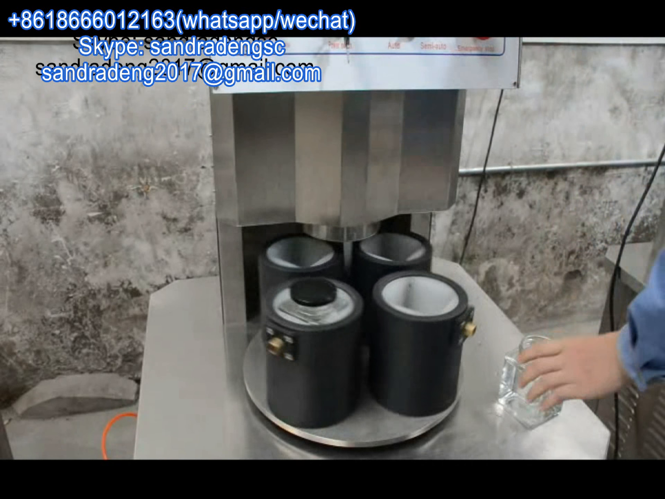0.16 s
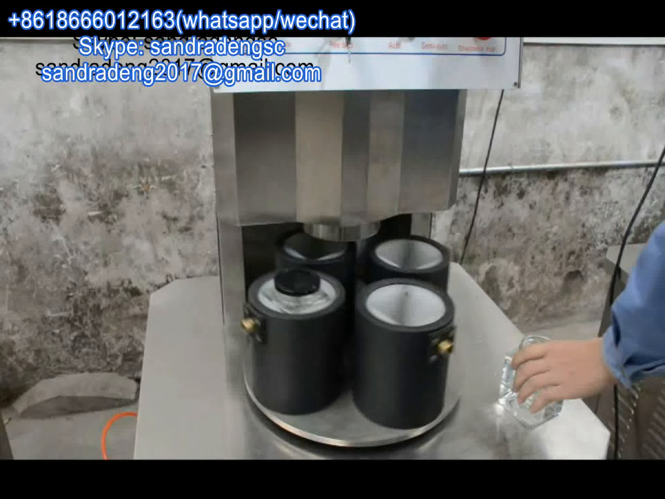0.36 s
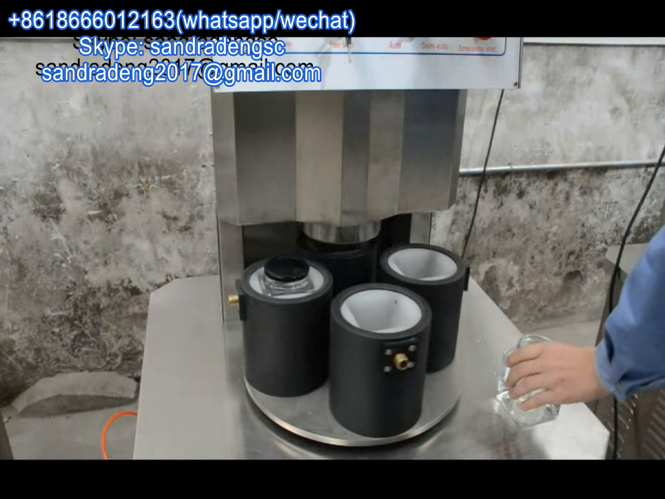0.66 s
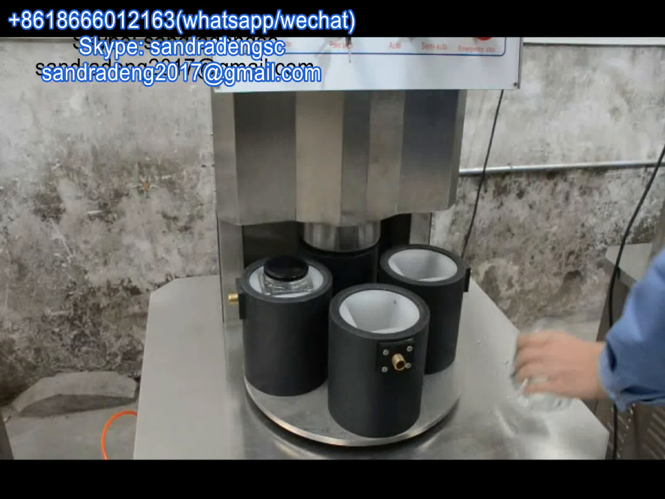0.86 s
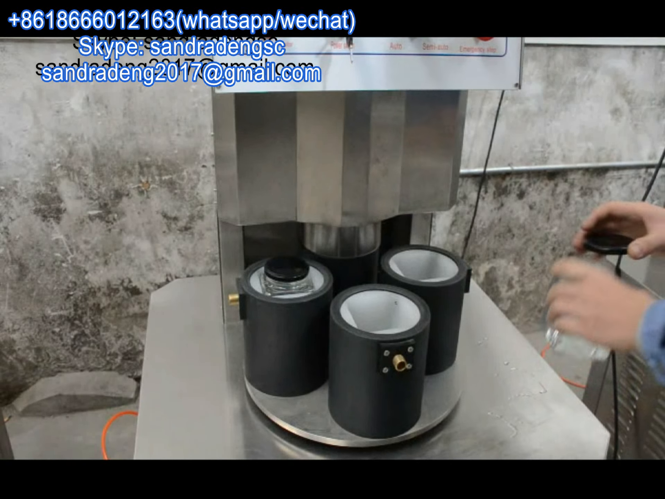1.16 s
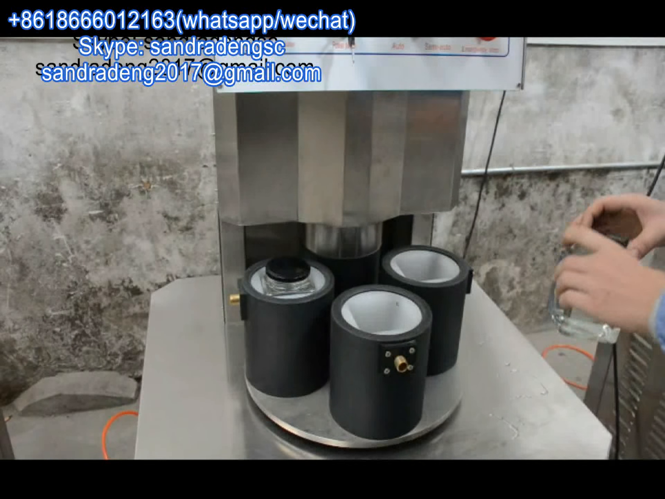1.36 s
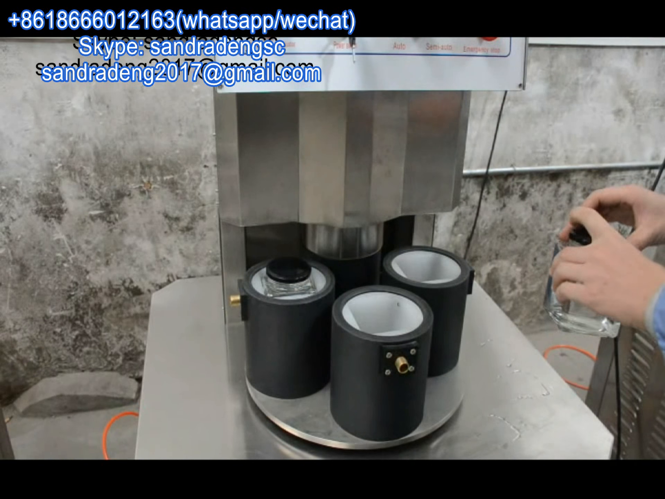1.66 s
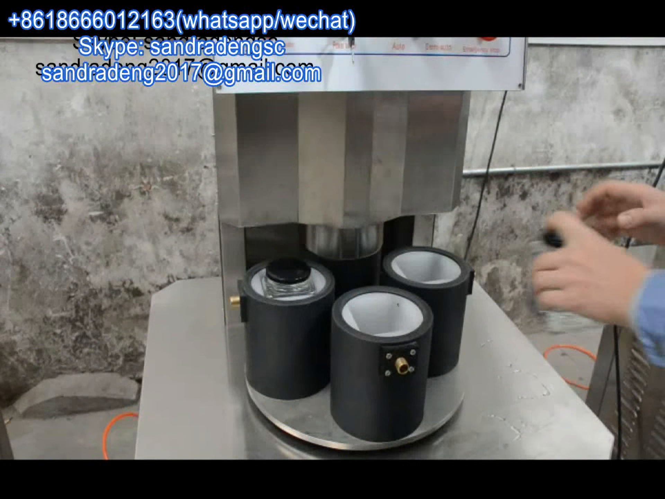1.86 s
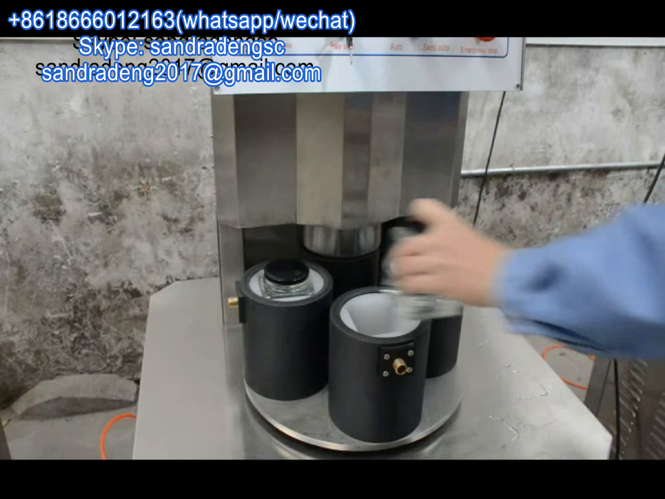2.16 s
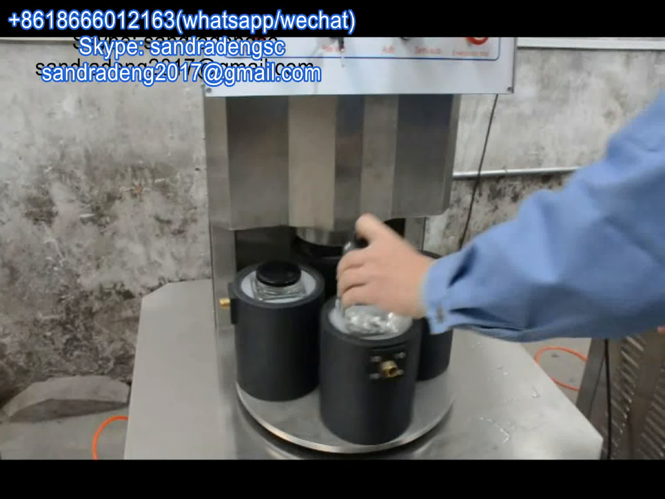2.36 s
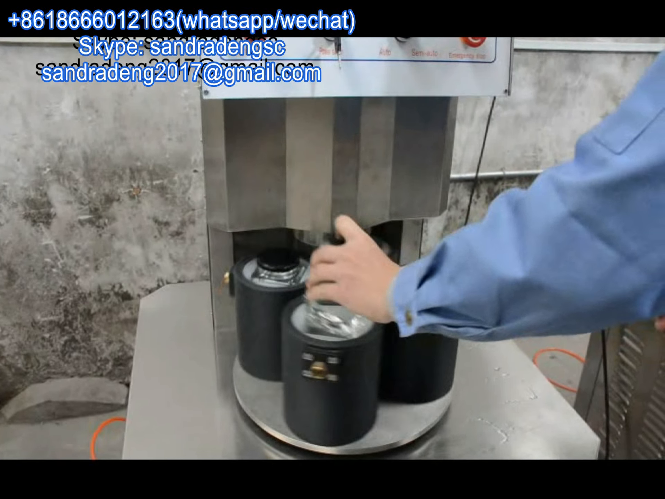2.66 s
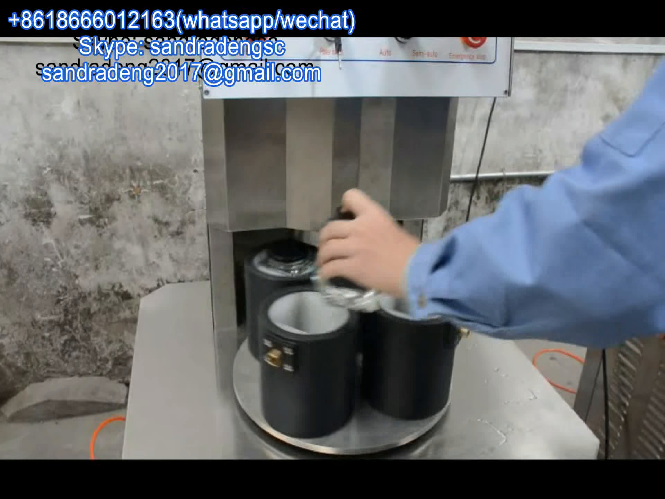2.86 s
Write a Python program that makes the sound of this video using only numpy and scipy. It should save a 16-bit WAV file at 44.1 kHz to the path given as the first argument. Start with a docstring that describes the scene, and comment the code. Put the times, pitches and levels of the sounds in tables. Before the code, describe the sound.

Pneumatic capping machine with sharp hisses, metal clunks, ratchet chatter and glass rattle over distant machine drone

```python
"""Pneumatic capping machine in a workshop

Valves spit, exhausts sigh and snap: shaped bursts of coloured noise, plus short dying tones. Cylinders clunk on
a steel frame, the capping head chatters tooth by tooth, a lid meets a jar, and the jar rattles: short noisy
contacts with dying tones. Thumps are dull noise, holder knocks tones. A long hall tail follows them over a
drone of distant machines. Both channels are the same."""
import sys
import numpy as np
from scipy import signal
from scipy.fft import rfft, irfft
from scipy.io import wavfile

SR = 44100
rng = np.random.default_rng(int(sys.argv[2]) if len(sys.argv) > 2 else 0)


def nominal_scale(level):
    """Amplitude ratio for a level in decibels (scalar or array-like)."""
    x = np.asarray(level, float) / 20
    return 10 ** x


def bounce(signal):
    """Save signal as a 16-bit WAV file at the path given by the first command-line argument."""
    frames = np.transpose(np.atleast_2d(signal))
    limited = np.clip(frames, -1, 1)
    pcm = np.round(limited * 32767).astype(np.int16)
    wavfile.write(sys.argv[1], SR, pcm)


N = 132300  # three seconds


def rms_one(x):
    """Scale a sound to an average strength (rms) of 1."""
    return x / np.sqrt(np.mean(x ** 2) + 1e-20)


def at_hz(points, hz):
    """Read a table of (Hz, value) between its points, on a log-frequency axis."""
    table = np.array(points)
    return np.interp(np.log(hz), np.log(table[:, 0]), table[:, 1])


def coloured(size, colour_db):
    """Noise of rms 1 whose spectrum in dB is a function of Hz."""
    hz = np.maximum(np.fft.rfftfreq(size, 1 / SR), 1)
    white = rfft(rng.standard_normal(size))
    return rms_one(irfft(white * nominal_scale(colour_db(hz)), size))


def drift(rate_hz):
    """A slow random wander of rms about 1: noise smoothed twice; a higher rate wanders faster."""
    r = np.exp(-2 * np.pi * rate_hz / SR)
    wander = signal.lfilter([1], [1, -2 * r, r * r], rng.standard_normal(N + SR))
    return rms_one(wander[SR:])  # the first second lets the filter settle


def add(out, start, rise, hold, fall, db, colour_db):
    """Add a burst of coloured noise that rises, holds and dies away; times in seconds."""
    sound = coloured(32768, colour_db)
    t = np.arange(len(sound)) / SR
    shape = np.minimum(t / rise, 1) * np.exp(-np.maximum(t - rise - hold, 0) / fall)
    # even out the luck of the noise, so that the shape alone sets the energy
    sound = sound * np.sqrt(np.sum(shape ** 2) / np.sum((shape * sound) ** 2))
    i = int(start * SR)
    out[i:i + len(t)] += (nominal_scale(db) * shape * sound)[:len(out) - i]


def strike(start, db, ring_hz, fall):
    """One mode struck once: a quick rise, then a sine that dies away over the fall in seconds."""
    t = np.maximum(np.arange(N) / SR - start, 0)
    envelope = np.minimum(t / 0.0015, 1) * np.exp(-t / fall)
    return nominal_scale(db) * envelope * np.sin(2 * np.pi * ring_hz * t)


def tilt(hz, bass_db, treble_db):
    """Raise or lower the bass below one corner and the treble above another."""
    bass_hz, treble_hz = 412, 1880
    return bass_db / (1 + (hz / bass_hz) ** 4) + treble_db / (1 + (treble_hz / hz) ** 4)


def drone():
    """Distant machines as noise: a steady roar, a wavering hum, rumble and a fading earlier cycle."""
    # Colour of the roar. Each row: frequency in Hz, relative level in dB per Hz.
    roar_colour = [(18, -65), (30, -75), (100, -57), (133, -12), (196, -13.5), (241, -8), (470, -11),
                   (548, -6), (849, -3), (1040, -3.5), (1660, -8), (2630, -14.5), (2840, -8.5), (9520, -37),
                   (14000, -99)]
    # The hum swells under load. Each row: time in seconds, level in dB.
    hum_level = [(0, -55.5), (1.2, -53.5), (1.6, -36.5), (2.0, -42), (2.499, -37), (3, -49.5)]
    roar_db, flicker_db, flicker_hz = -31, 1.5, 4.8
    hum_hz, hum_width_hz = 131, 12
    rumble_db, rumble_top_hz = -57.5, 88
    earlier_db, earlier_fade_db_per_s = -27.5, 21.5
    t = np.arange(N) / SR

    roar = coloured(N, lambda hz: at_hz(roar_colour, hz))
    roar = roar * nominal_scale(roar_db + flicker_db * drift(flicker_hz))
    # noise this narrow sounds like a wavering tone
    hum = coloured(N, lambda hz: -20 * np.log10(1 + ((hz - hum_hz) / hum_width_hz) ** 2))
    hum = hum * nominal_scale(np.interp(t, *np.transpose(hum_level)))
    rumble = nominal_scale(rumble_db) * coloured(N, lambda hz: -10 * np.log10(1 + (hz / rumble_top_hz) ** 8))
    # an earlier cycle still rings at the start
    earlier = coloured(N, lambda hz: at_hz(roar_colour, hz) + tilt(hz, 0.89, 8.2))
    earlier = earlier * nominal_scale(earlier_db - earlier_fade_db_per_s * t)
    return roar + hum + rumble + earlier


def hall(x):
    """The echo of the hall: a diffuse tail of noise bands that each die at their own rate."""
    # How long the hall rings. Each row: frequency in Hz, time to fall by 60 dB in seconds.
    ring_time = [(100, 1.3), (500, 1.6), (1500, 1.35), (4000, 1.13), (8000, 0.56), (13000, 0.37)]
    level_db, gap_s, build_s = -3.5, 0.0014, 0.026
    size = 2 * SR
    t = np.arange(size) / SR
    hz = np.maximum(np.fft.rfftfreq(size, 1 / SR), 1)
    white = rfft(rng.standard_normal(size))
    tail = np.zeros(size)
    for centre in 60 * 2.0 ** np.arange(9):  # one band per octave, overlapping its neighbours
        octaves = np.clip(np.log2(hz / centre), -1, 1)
        share = np.cos(np.pi / 2 * octaves) ** 2
        tail += irfft(white * share, size) * nominal_scale(-60 * t / at_hz(ring_time, centre))
    tail *= np.clip((t - gap_s) / build_s, 0, 1)
    tail = tail / np.sqrt(np.sum(tail ** 2))
    return nominal_scale(level_db) * signal.fftconvolve(x, tail)[:N]


def ticks():
    """Faint high ticks: tiny bursts of noise around one high frequency."""
    # Each row: start in seconds, level in dB.
    tick_rows = [(.912, -58), (2.735, -62)]
    tick_hz, fall = 9900, 0.0026
    out = np.zeros(N)
    for start, db in tick_rows:
        add(out, start, 0.001, 0.002, fall, db, lambda hz: -500 * np.log(hz / tick_hz) ** 2)
    return out


def thumps():
    """Close dull thumps of valves and pistons: short pushes of noise with little above a corner."""
    # Each row: start in seconds, level in dB, upper corner in Hz, length in seconds.
    thump_rows = [(0.517, -21, 800, 0.011), (1.057, -27.5, 231, 0.027), (1.363, -18, 892, 0.004),
                  (1.432, -23.5, 394, 0.029), (1.471, -35, 90, .02), (1.964, -20, 1120, 0.0067),
                  (2.316, -17, 428, 0.012)]
    out = np.zeros(N)
    for start, db, corner_hz, length in thump_rows:
        low_hz = min(190, corner_hz / 2)

        def colour(hz):
            low_cut = -10 * np.log10(1 + (low_hz / hz) ** 6)
            high_cut = -10 * np.log10(1 + (hz / corner_hz) ** 6)
            return low_cut + high_cut

        add(out, start, 0.002, length, 0.66 * length, db, colour)
    return out


def holder_knocks():
    """Solid knocks on the holder or frame ring two of its modes."""
    # Each row: start in seconds, low ring in dB, high ring in dB.
    knock_rows = [(1.571, -15, -8), (2.316, -12, -30), (2.417, -30, -11)]
    low_hz, low_fall, high_hz, high_fall = 318, 0.011, 1231, 0.0081
    out = np.zeros(N)
    for start, low_db, high_db in knock_rows:
        out += strike(start, low_db, low_hz, low_fall)
        out += strike(start, high_db, high_hz, high_fall)
    return out


def lid_on_jar():
    """The lid meets the glass: each touch rings the modes of the jar and rubs noise through them."""
    # The lid scraped on glass. Each row: start in seconds, level in dB.
    touches = [(1.396, -19.5), (1.418, -18)]
    # Modes of the jar. Each row: frequency in Hz, level in dB, width in Hz (for the rub).
    glass_modes = [(1514, -5.5, 48), (1880, -2, 64), (2190, -1, 53)]
    contact, ring_db = 0.0072, 9  # seconds; clear ring against the rub
    out = np.zeros(N)

    def colour(hz):
        power = sum(nominal_scale(2 * lift_db) / (1 + ((hz - mode_hz) / width) ** 4)
                    for mode_hz, lift_db, width in glass_modes)
        return 10 * np.log10(power)

    for start, db in touches:
        for mode_hz, lift_db, _ in glass_modes:
            out += strike(start, db + lift_db + ring_db, mode_hz, contact)
        add(out, start, 0.002, contact, 0.006, db, colour)
    return out


def jar_rattle():
    """The jar rattles into its holder: each hit is a short ring with grit around its pitch."""
    # Each row: start in seconds, level of the ring in dB, ring in Hz.
    hits = [(2.283, -10, 3660), (2.306, -15, 3050), (2.33, -8, 3120), (2.345, -5, 2820), (2.371, -9, 3690),
            (2.38, -7, 2710), (2.375, -8, 4680), (2.421, -5.5, 3880), (2.534, -13, 3840)]
    fall, grit_db, relative_width = 0.0035, -11, 0.077  # seconds; grit against the ring
    out = np.zeros(N)
    for start, db, ring_hz in hits:

        def colour(hz):
            peak = -15 * np.log10(1 + (np.log(hz / ring_hz) / relative_width) ** 2)
            high_cut = -10 * np.log10(1 + (hz / 6000) ** 8)
            return peak + high_cut

        out += strike(start, db, ring_hz, fall)
        add(out, start, 0.001, 0.003, fall, db + grit_db, colour)
    return out


def chatter():
    """Ratchet teeth knock the head and ring the pawl, every other one the housing: knocks, rings."""
    # Colour of the head. Each row: frequency in Hz, relative level in dB per Hz.
    head_colour = [(50, -41), (110, -34), (185, 5), (350, -9), (750, -3), (1150, -2.5), (1600, -2.5),
                   (1950, -4), (2130, -3), (2400, -6.5), (3600, -11), (6000, -21), (13000, -60)]
    # Strength along the way, before the differences from tooth to tooth.
    # Each row: time in seconds, body knock in dB, pawl ring in dB, housing ring in dB.
    strength = [(.68, -21, -16, -20), (.74, -21, -14, -19), (.83, -24, -10, -25), (.9, -26, -16, -40),
                (.955, -22, -13, -40), (.985, -28, -20, -40)]
    first_s, gap_s, slowing_s, jitter_s, teeth = 0.6833, 0.0183, 0.000032, 0.0006, 17
    weak_tooth_db, spread_db = -6, 1.2
    contact, knock_bass_db = 0.0077, -10
    pawl_hz, pawl_fall = 2140, 0.0071
    housing_hz, housing_fall, housing_lag_s = 184, 0.013, 0.008

    def knock_colour(hz):
        return at_hz(head_colour, hz) + tilt(hz, knock_bass_db, 0)

    knocks, rings = np.zeros((2, N))
    times, *columns = np.transpose(strength)
    chance = rng.standard_normal((teeth, 3))
    for k, (late, loud, sharp) in enumerate(chance):
        start = first_s + (gap_s + slowing_s * k) * k + jitter_s * late
        body_db, pawl_db, housing_db = (np.interp(start, times, column) for column in columns)
        weak = k % 2  # every second tooth is weak
        tooth_db = weak_tooth_db * weak + spread_db * loud
        add(knocks, start, 0.001, 0.002, contact, body_db + tooth_db, knock_colour)
        rings += strike(start, pawl_db + tooth_db, pawl_hz * (1 + 0.038 * sharp), pawl_fall)
        if not weak:
            rings += strike(start + housing_lag_s, housing_db, housing_hz * (1 + 0.05 * sharp), housing_fall)
    # the head stops with a knock
    add(knocks, 0.9965, 0.001, 0.003, contact, -13, knock_colour)
    # the head grinds, bass-heavy, as it starts
    add(knocks, 0.61, 0.01, 0.13, 0.2, -27, lambda hz: at_hz(head_colour, hz) + tilt(hz, 2.5, 0))
    return knocks, rings


def clunks():
    """Each blow is a short grinding contact that shakes the frame and its modes, with a clear ring."""
    # Each row: start in seconds, level in dB, bass in dB, treble in dB, contact length in seconds
    # (it scales hold and fall), frequency in Hz that the place struck favours.
    blows = [(0.655, -8.5, -25, 11, 0.0074, 868), (1.08, -16, -3.5, 4, 0.018, 1225),
             (1.427, -17, 3, -8, 0.019, 755), (1.47, -13, 0.5, 14, 0.01, 953),
             (1.569, -11, -4, 4.5, 0.018, 1145), (1.609, -22.5, 0.5, -8, 0.042, 984),
             (1.657, -31, -14, -1, 0.014, 1030), (2.039, -6, -1.5, 2.5, 0.01, 826),
             (2.093, -16.5, -28, -14, 0.021, 790), (2.333, -16, -0.5, -8, 0.021, 990),
             (2.354, -18.5, -8, -8, 0.0085, 1250), (2.376, -15, 3.5, 1, 0.011, 1626),
             (2.412, -16.5, -14, 0, 0.017, 1250), (2.45, -16.5, -2, -2, 0.015, 1250)]
    # Colour of the frame. Each row: frequency in Hz, relative level in dB per Hz.
    frame_colour = [(35, -56), (60, -43), (250, -12), (1200, -2), (1680, -7), (2840, -11.5), (5330, -22),
                    (5790, -21.5), (7610, -21.5), (9000, -34.5), (11700, -59), (19800, -120)]
    # Ringing of the frame. Each row: frequency in Hz, dB above the body, width in Hz.
    frame_modes = [(186, 10.5, 77), (342, 4.5, 41), (790, 1.5, 150), (1010, 0.5, 18), (1250, -0.5, 20),
                   (2100, -5.5, 130), (3030, 4, 400)]
    ring_db = -4  # clear ring against the grinding part
    favour_db, favour_width = 2, 0.15
    out = np.zeros(N)
    for start, db, bass_db, treble_db, contact, favoured_hz in blows:

        def colour(hz):
            body = at_hz(frame_colour, hz) + tilt(hz, bass_db, treble_db)
            place = favour_db / (1 + (np.log(hz / favoured_hz) / favour_width) ** 2)
            modes = sum(lift_db / (1 + ((hz - mode_hz) / width) ** 2)
                        for mode_hz, lift_db, width in frame_modes)
            return body + place + modes

        out += strike(start, db + ring_db, favoured_hz, contact)
        add(out, start, 0.001, 0.51 * contact, 1.17 * contact, db, colour)
    return out


def snaps():
    """Sharp snaps inside an exhaust: very short dying tones."""
    # Each row: start in seconds, level in dB, ring in Hz.
    snap_rows = [(1.247, -7, 3000), (1.266, -3, 3030), (1.285, -10, 3050), (1.299, -9, 3280),
                 (1.319, -14, 3150)]
    return sum(strike(start, db, ring_hz, 0.002) for start, db, ring_hz in snap_rows)


def sighs():
    """Long exhaust sighs: air noise that swells, holds and dies while its level flutters."""
    # Each row: start in seconds, rise in seconds, hold in seconds, level in dB, fall in seconds.
    sigh_rows = [(0.219, 0.027, 0.039, -18.5, 0.068), (1.104, 0.011, 0.13, -25, 0.044),
                 (1.235, 0.01, 0.045, -16.5, 0.067), (1.59, 0.016, 0.029, -25, 0.1),
                 (2.067, 0.12, 0.18, -21.5, .05), (2.26, 0.02, 0.08, -20.5, 0.18),
                 (2.497, 0.0074, 0.046, -41, 0.038)]
    # Colour of the air. Each row: frequency in Hz, relative level in dB per Hz.
    air_colour = [(880, -33), (1660, -13.5), (2050, -6), (2430, -4.5), (3410, 0.5), (4390, -13.5),
                  (4740, -10), (5460, -12), (5780, -14), (9340, -23.5), (11100, -51), (13600, -59),
                  (14300, -81)]
    flutter_db, flutter_hz = 1.5, 37
    out = np.zeros(N)
    for start, rise, hold, db, fall in sigh_rows:
        add(out, start, rise, hold, fall, db, lambda hz: at_hz(air_colour, hz))
    return out * nominal_scale(flutter_db * drift(flutter_hz))


def spits():
    """Sharp valve spits: abrupt hiss with a peak where the air whistles in the nozzle."""
    # Each row: start in seconds, hold in seconds, level in dB, nozzle whistle in Hz,
    # whistle above the hiss in dB, relative width of the whistle.
    spit_rows = [(0.509, 0.025, -27, 9400, 22.5, 0.16), (0.5215, 0.013, -10, 5530, 7, 0.072),
                 (0.577, 0.032, -23.5, 5260, 22, 0.053), (1.047, 0.02, -28.5, 9150, 16, 0.11),
                 (1.064, 0.032, -12, 4180, 2, 0.088), (1.3662, 0.0099, -9, 7580, 14, 0.16),
                 (1.384, 0.036, -19, 7430, 15, 0.026), (1.464, 0.015, -13, 5030, 5, 0.031),
                 (1.488, .008, -14, 3330, 11, .12), (1.57, 0.0046, -10, 3580, 18, 0.48),
                 (1.601, 0.0074, -11.5, 2940, 36, 0.26), (1.96, 0.0077, -21.5, 6860, 2, .1),
                 (1.971, 0.012, -8.5, 7630, 22, 0.2), (1.986, 0.023, -22, 5900, -8, 0.064),
                 (1.999, 0.039, -16.5, 3520, 4, 0.25), (2.048, 0.19, -25, 7570, 9, 0.029),
                 (2.328, 0.03, -17.5, 7350, 4, 0.038)]
    # Colour of the hiss. Each row: frequency in Hz, relative level in dB per Hz.
    hiss_colour = [(710, -26), (1200, -24), (2010, -14), (2350, -10.5), (2810, -10), (3640, 0), (4660, -7),
                   (5170, -2), (6050, -11), (7360, -8), (8250, -19.5), (9340, -21), (14300, -57.5)]
    rise, fall = 0.0008, 0.012  # seconds
    out = np.zeros(N)
    for start, hold, db, nozzle_hz, whistle_db, width in spit_rows:

        def colour(hz):
            whistle = whistle_db / (1 + (np.log(hz / nozzle_hz) / width) ** 2)
            return at_hz(hiss_colour, hz) + whistle

        add(out, start, rise, hold, fall, db, colour)
    return out


def scene():
    """All sources, their hall and the drone, the same in both channels."""
    head, rings = chatter()
    air_and_frame = spits() + sighs() + clunks()
    dull = thumps() + rings
    small = lid_on_jar() + jar_rattle() + ticks() + holder_knocks() + snaps()
    # each group feeds the hall by its own amount in dB
    sent = air_and_frame + nominal_scale(-0.5) * head + nominal_scale(-7.5) * dull + nominal_scale(-9) * small
    mix = air_and_frame + head + dull + small + hall(sent) + drone()
    return np.tile(mix, (2, 1))


def microphone(x):
    """The microphone has narrow dips and bumps and loses the deepest bass."""
    # Each row: centre in Hz, lift in dB, width in Hz.
    bumps = [(5710, -14, 67), (6720, -17, 33), (9600, 3, 390), (11350, 12, 650), (12400, 0, 340),
             (13400, 13, 890)]
    low_cut_hz = 60
    hz = np.maximum(np.fft.rfftfreq(N, 1 / SR), 1)
    colour_db = sum(db / (1 + ((hz - centre_hz) / width) ** 2) for centre_hz, db, width in bumps)
    low_cut = 1 / np.sqrt(1 + (low_cut_hz / hz) ** 4)
    return irfft(rfft(x) * nominal_scale(colour_db) * low_cut, N)


def gain_control(x):
    """The recorder turns loud stretches down by a share of their excess over a threshold."""
    threshold_db, share, smoothing_s = -13, 0.51, 0.26
    r = np.exp(-1 / (smoothing_s * SR))
    power = signal.lfilter([1 - r], [1, -r], x ** 2)
    level_db = 10 * np.log10(power + 1e-12)
    return x * nominal_scale(-share * np.maximum(level_db - threshold_db, 0))


def top_cut(x):
    """Nothing passes above the cut-off."""
    return signal.sosfilt(signal.butter(12, 14430, fs=SR, output="sos"), x)


def record(dry):
    """The microphone colours, gain control squeezes, peaks are rounded and the top is cut off."""
    peak_top, top_hz = 1.12, 14600
    squeezed = gain_control(microphone(dry))
    rounded = peak_top * np.tanh(squeezed / peak_top)
    high_cut = signal.cheby2(20, 70, top_hz, fs=SR, output="sos")
    finished = signal.sosfilt(high_cut, rounded)
    return top_cut(finished)


dry = scene()
out = record(dry)
bounce(out)
```